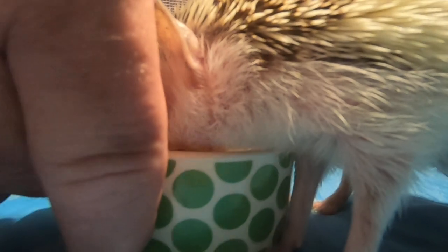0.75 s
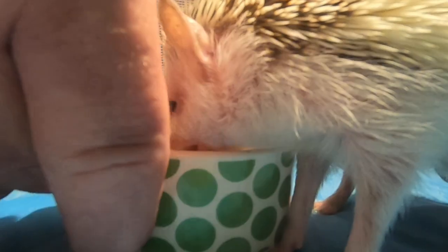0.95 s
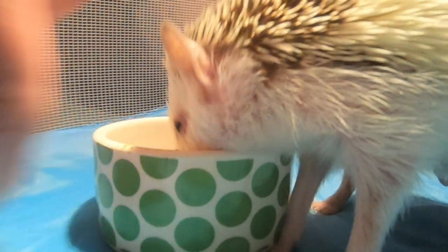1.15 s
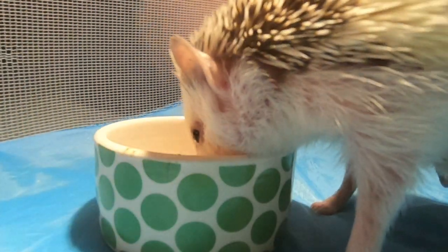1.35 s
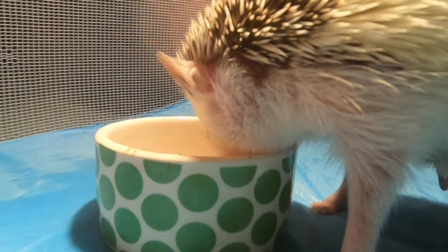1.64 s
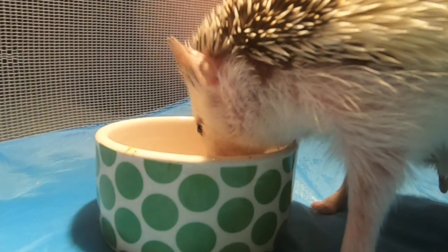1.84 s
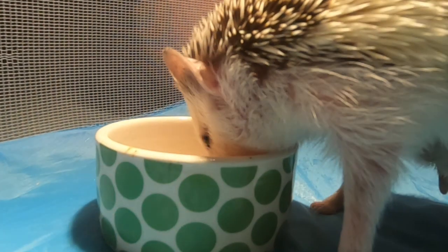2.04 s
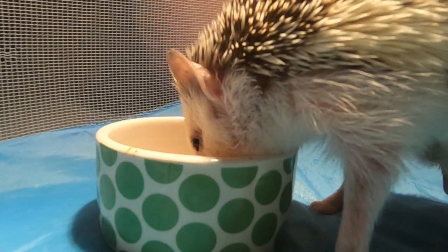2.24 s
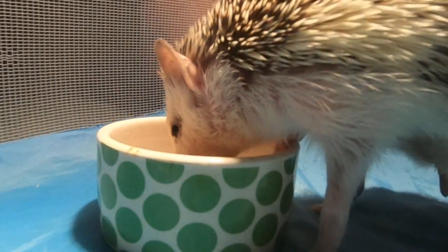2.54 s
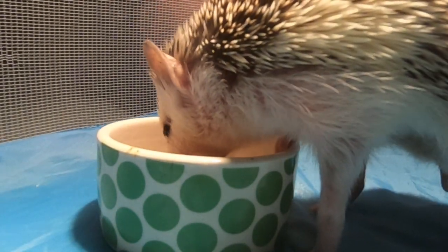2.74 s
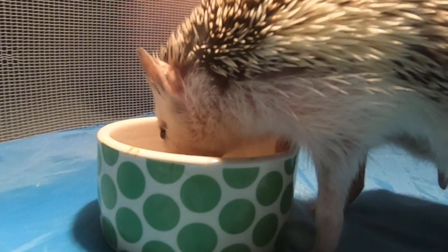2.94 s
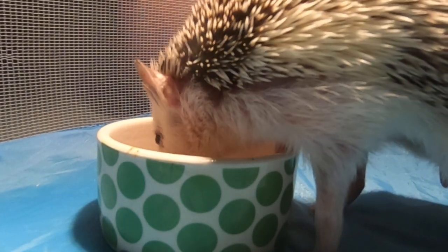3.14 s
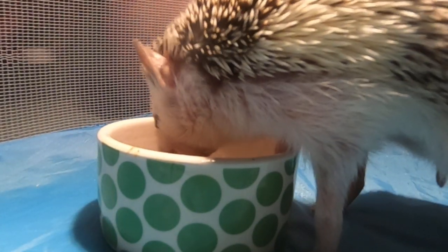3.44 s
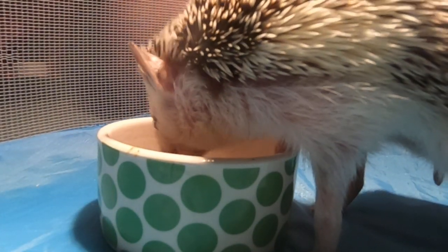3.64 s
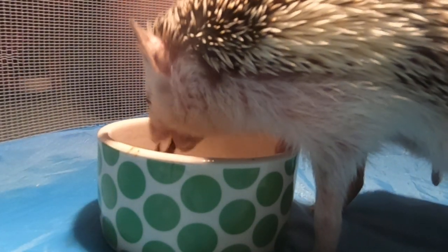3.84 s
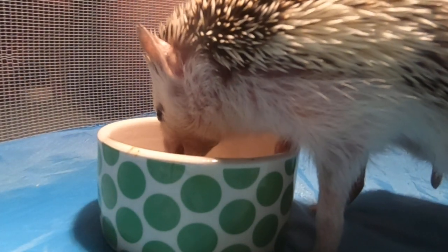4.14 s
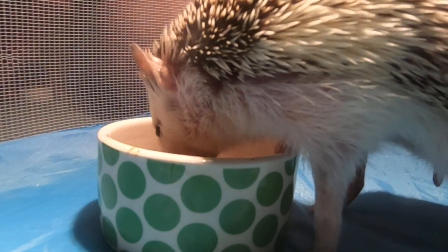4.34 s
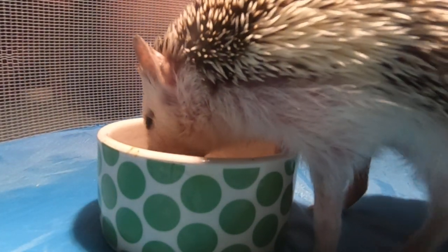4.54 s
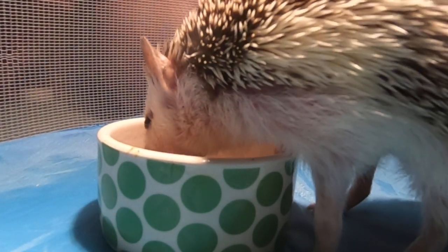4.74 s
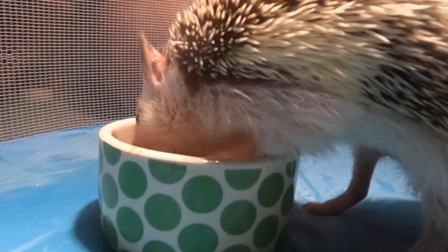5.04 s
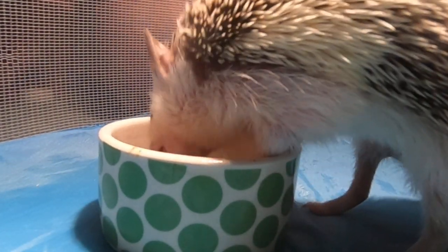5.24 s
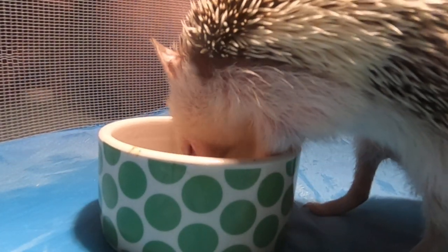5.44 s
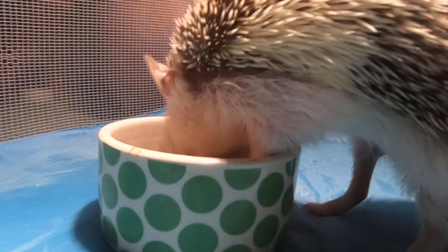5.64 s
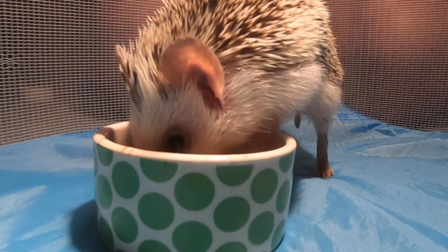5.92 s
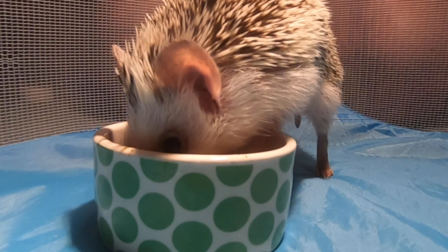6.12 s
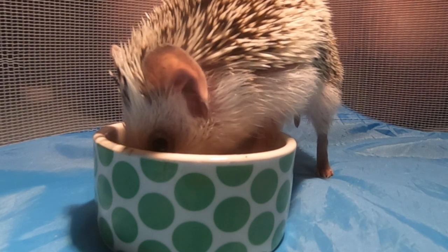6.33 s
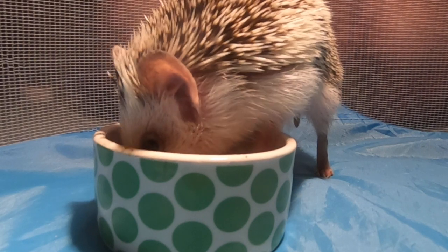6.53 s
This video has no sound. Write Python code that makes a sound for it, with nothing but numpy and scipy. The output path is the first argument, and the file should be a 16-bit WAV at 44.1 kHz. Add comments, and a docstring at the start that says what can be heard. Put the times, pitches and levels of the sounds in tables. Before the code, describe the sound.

Handling thumps and a short gritty bowl scrape, then close, rapid wet crunching and lapping with tiny ceramic ticks in a quiet, faintly humming room.

```python
"""Quiet room: a hedgehog laps and chews soft food in a small ceramic bowl close to a two-port microphone.
Strokes, about five a second once chewing runs, shape grain noise into wet fizz and crunch; sine bursts
make snaps and ticks. Early on a hand jolts the microphone (slow swings, rattle), slides on the rim and
scrapes the bowl. Underneath: a wavering sine hum, low rings and dull thuds, and room noise."""
import sys
import numpy as np
from scipy import signal
from scipy.fft import rfft, irfft, next_fast_len
from scipy.io import wavfile
from scipy.ndimage import uniform_filter1d, map_coordinates

SR = 44100
rng = np.random.default_rng(int(sys.argv[2]) if len(sys.argv) > 2 else 0)


def pcm_store(signal):
    """Save signal as 16-bit PCM."""
    levels = np.round(np.clip(np.atleast_2d(signal), -1, 1) * 32767)
    wavfile.write(sys.argv[1], SR, levels.astype(np.int16).T)


def decibels_to_gain(level_db):
    """Convert a level in decibels to a linear amplitude gain (20 dB per decade)."""
    exponent = np.asarray(level_db, float) / 20
    return 10 ** exponent


N = 294588

# Near-source levels, strokes to scrape, are before NEAR_GAIN_DB, port tilt and walls.
# strokes: first a crunchy contact and faint hissy touches, then firm bites and soft licks:
#   (time [s], stroke level [dB], bowl knock drive over stroke [dB], crunch over stroke [dB])
STROKES = [(0.022, -54.5, 9.5, 11), (0.115, -58, -4, -9), (0.166, -65, -3, -18), (0.532, -57, -12, -15),
           (0.891, -45.5, -29, -8), (1.215, -42.5, -23, -11), (1.314, -57.5, -8, 2),
           (1.473, -49.5, -11, -10), (1.561, -51, -9, -10), (1.678, -39.5, -16.5, -14),
           (1.774, -52.5, -9, -7), (1.889, -44.5, -14, -11.5), (1.969, -53, -16, -7),
           (2.088, -38.5, -21, -21), (2.172, -52.5, -17, -17), (2.279, -39, -18, -12),
           (2.364, -54.5, -11, -26), (2.483, -48, -13, -9), (2.567, -52.5, -13, -36),
           (2.676, -41, -15, -14), (2.762, -56, -10, -34), (2.873, -38.5, -20, -11), (2.959, -54, -16, -13),
           (3.072, -43.5, -16, -17), (3.155, -50, -13, -36), (3.267, -45.5, -15, -17),
           (3.352, -54.5, -25, -26), (3.466, -42, -20, -20), (3.555, -55.5, -13, -4),
           (3.663, -43, -13, -12.5), (3.754, -56.5, -17, -5), (3.871, -46, -16, -2),
           (3.963, -58.5, -11, -12), (4.075, -44, -14, -12.5), (4.166, -55.5, -11, -11),
           (4.281, -45, -12, -12.5), (4.381, -56, -9, -19), (4.494, -50.5, -20, -18),
           (4.578, -55.5, -1.5, -9), (4.691, -46.5, -16, -18), (4.79, -57.5, -11, -19),
           (4.899, -41, -15, -30), (4.992, -58.5, -20, 0), (5.109, -48.5, -28, -8),
           (5.337, -47, -13, -10.5), (5.583, -45, -30, -12), (5.868, -42, -12.5, -5.5),
           (6.149, -47, -10, -12), (6.4, -52.5, -5, -7), (6.63, -47, -6, -13)]
# mouth work between strokes: (time [s], crackle level [dB], fizz level [dB])
MOUTH_WORK = [(0.0, -65, -59), (0.13, -67, -62), (0.24, -59.5, -62.5), (0.28, -80, -80), (0.48, -73, -77),
              (0.56, -66.5, -67), (0.84, -70, -54.5), (0.89, -55.5, -65), (1.19, -60.5, -68),
              (1.9, -68.5, -64), (2.5, -60.5, -65), (3.0, -67, -66), (3.7, -63.5, -66), (3.92, -58, -65),
              (4.22, -68, -64.5), (4.52, -58.5, -64), (4.82, -63, -69.5), (5.15, -61, -65),
              (5.44, -63, -68), (5.53, -70.5, -69), (5.7, -58.5, -68), (5.98, -60, -67), (6.07, -66.5, -76),
              (6.22, -62, -64), (6.35, -66, -77), (6.45, -62.5, -71), (6.68, -67.5, -67.5)]
# wet snaps inside the bites: (time [s], amplitude [dB], pitch [Hz])
SNAPS = [(1.2157, -27, 9460), (1.474, -41, 9500), (1.4787, -39, 9500), (1.6571, -40, 9600),
         (1.6723, -39, 9350), (1.68, -41, 9200), (1.6833, -33, 10300), (1.887, -42, 9410),
         (2.084, -39, 9040), (2.089, -43, 9190), (2.0912, -36, 9400), (2.279, -45, 9700),
         (2.2817, -40, 9080), (2.4786, -40, 8400), (2.481, -38, 9700), (2.487, -34, 8800),
         (2.6761, -42, 9600), (2.679, -43, 9600), (2.877, -36, 9200), (3.05, -41, 8960),
         (3.0703, -43, 9300), (3.075, -32, 8460), (3.1533, -37, 9300), (3.265, -36, 9460),
         (3.2682, -33.5, 9200), (3.465, -32, 10100), (3.4684, -34, 9100), (3.6591, -35, 10300),
         (3.6637, -36, 9900), (3.8704, -36, 9500), (3.8743, -44, 9280), (4.0715, -32.5, 10100),
         (4.0757, -40, 9150), (4.28, -39, 9120), (4.2827, -39, 9000), (4.285, -35, 9470),
         (4.4936, -34.5, 9400), (4.6874, -42, 9740), (4.6928, -35, 10000), (4.8987, -41, 8900),
         (5.1094, -41, 8590), (5.3372, -38, 10270), (5.5801, -35, 9140), (5.5843, -29.5, 9200),
         (5.8674, -43, 9200), (5.87, -34, 9300), (6.403, -37, 8650), (6.6294, -37, 10300)]
# teeth and food on the bowl: (time [s], amplitude [dB], pitch [Hz])
KNOCKS = [(1.2141, -47, 780), (1.458, -54.5, 770), (1.6768, -56, 720), (1.8876, -48, 760),
          (2.0849, -49.5, 765), (2.2127, -52.5, 805), (2.5773, -48, 696), (2.6525, -54, 750),
          (2.6732, -55, 785), (2.8494, -46, 700), (2.8722, -57, 820), (3.0673, -48.5, 770),
          (3.2652, -55, 780), (3.6586, -55, 840), (3.8673, -52, 770), (4.0701, -43.5, 880),
          (4.2817, -50.5, 750), (4.387, -56, 730), (4.4883, -48, 730), (4.5131, -44.5, 634),
          (4.5835, -62, 775), (4.6717, -46, 740), (4.6869, -55, 810), (5.1034, -53, 760),
          (5.3358, -48, 850), (5.5825, -47, 685), (5.8674, -43.5, 730), (6.1456, -46.5, 796),
          (6.6197, -48, 780)]
# rise times handed out to the knocks in turn, for variety: (rise [ms] of each)
KNOCK_RISES_MS = (.9, 1.9, 1.3)
# ticks of handling, bowl scrape, tongue and food: (time [s], blow [dB], pitch [Hz])
TICKS = [(0.025, -20, 2180), (0.071, -30, 1010), (0.169, -24, 7350), (0.233, -33, 3280), (0.371, -46, 2950),
         (0.391, -45.5, 6000), (0.5048, -34, 9300), (0.518, -39, 6060), (0.5877, -27, 8700),
         (0.6322, -39, 6500), (0.6659, -36, 6100), (0.7257, -15, 2680), (0.7066, -14, 2284),
         (0.7605, -18, 2740), (0.902, -24, 3280), (0.989, -28.5, 2600), (1.01, -36, 2500),
         (1.045, -33.5, 3400), (1.0729, -35, 2440), (1.2049, -32.5, 3470), (1.242, -30, 8600),
         (1.2595, -29, 4700), (1.312, -29, 5830), (1.4583, -31, 3200), (1.5607, -30, 3700),
         (1.578, -48, 3520), (1.5838, -36, 2800), (1.6117, -33, 2250), (1.723, -33.5, 8690),
         (1.787, -33, 8500), (1.8021, -35, 4200), (1.826, -37, 6000), (1.8875, -34, 6790),
         (1.9153, -32.5, 5060), (1.94, -36, 3520), (1.9737, -30, 4700), (2.0505, -35, 6700),
         (2.2136, -37, 2370), (2.279, -36, 5070), (2.315, -38, 4500), (2.3638, -32, 3620),
         (2.389, -40, 8000), (2.4215, -38.5, 2740), (2.452, -31.5, 5000), (2.513, -36, 4000),
         (2.536, -47, 5030), (2.796, -37, 2100), (2.825, -32.5, 9000), (3.047, -30, 7860),
         (3.1782, -41, 4000), (3.5148, -33, 6610), (3.5316, -29.5, 3430), (3.7397, -38, 6100),
         (4.1671, -30.5, 9600), (4.185, -32, 6400), (4.3205, -27.5, 5800), (4.5127, -22.5, 3620),
         (4.533, -32, 1360), (5.149, -27, 2560), (5.243, -37, 5200), (5.256, -33.5, 5830),
         (5.4278, -36, 5600), (5.447, -38, 5540), (5.6564, -31, 4850), (5.842, -35, 4440),
         (5.8675, -30.5, 4500), (5.935, -37, 6000), (5.9567, -31.5, 6950), (5.966, -35, 5330),
         (5.989, -36, 5540), (6.202, -37.5, 2820), (6.223, -36, 4840), (6.438, -38, 4800),
         (6.5103, -33, 6100)]
# soft rustle in the hollow of the bowl: (time [s], level [dB])
RUSTLE = [(0.0, -53.5), (.05, -56.5), (0.13, -57), (0.29, -58.5), (0.34, -68), (0.43, -69.5), (.47, -65.5),
          (0.56, -62.5), (0.65, -63), (0.82, -61), (0.89, -66), (1.2, -70.5), (4.8, -76), (5.22, -71),
          (5.41, -83), (5.62, -73), (5.85, -73), (6.25, -77), (6.68, -80)]
# thin nose whistles: (start [s], end [s], start pitch [Hz], end pitch [Hz], level [dB], waver [Hz])
WHISTLES = [(.262, .316, 14400, 8500, -70, 50), (.238, .29, 10900, 8500, -73, 50),
            (.287, .303, 11800, 13900, -78, 50), (.172, .2, 9500, 10300, -72, 90),
            (5.145, 5.24, 10750, 11900, -68, 40), (5.225, 5.29, 11800, 12200, -69, 40),
            (5.58, 5.98, 2290, 2190, -69, 65)]
# fingers slide on the rim: (time [s], level [dB], power share of the high band [0-1])
SLIDE = [(.44, -81, 0.1), (.48, -70, .15), (.52, -64, 0.2), (.58, -64, 0.4), (.63, -61, 0.5),
         (.67, -67, 0.7), (.7, -85, .8)]
# bowl dragged over the mat: (time [s], level [dB])
SCRAPE = [(0.66, -63), (0.683, -61), (0.688, -43.5), (0.702, -32.5), (0.728, -33), (0.744, -43),
          (0.765, -41), (0.782, -33), (0.803, -30), (0.826, -37.5), (0.85, -50.5), (0.9, -56), (0.93, -46),
          (0.95, -61), (1.1, -65)]
# microphone swings: (time [s], swing rate [Hz], Gaussian sigma [ms], amplitude before envelope [dB])
JOLTS = [(0.192, 16.7, 25.5, -26.5), (0.269, 20, 32, -37), (.418, 15, 45, -43.5), (.6, 17, 33, -51)]
# handling rattle: (time [s], level [dB])
RATTLE = [(0.1, -65), (0.16, -64), (0.2, -54), (0.25, -51), (0.264, -41.5), (0.29, -42.5), (0.318, -50.5),
          (0.372, -47), (0.42, -53), (0.462, -63), (0.61, -59), (0.65, -70)]
# hum strength: (time [s], amplitude [dB])
HUM_LEVEL = [(0.0, -65), (0.33, -53.5), (1.05, -66.5), (2.0, -62.5), (2.85, -61.5), (3.12, -55.5),
             (3.37, -61), (3.7, -58.5), (3.91, -54.5), (4.13, -68), (4.25, -59), (4.6, -51), (4.74, -64.5),
             (4.84, -53.5), (5.12, -60.5), (5.25, -74), (5.75, -71), (5.9, -91), (6.2, -65), (6.68, -85)]
# pitch of the hum, with a second, higher tone taking its place at 3.1-3.27 s: (time [s], pitch [Hz])
HUM_PITCH = [(0, 159.7), (.6, 163), (2.3, 152.8), (3.0, 158), (3.1, 171.5), (3.27, 170.4), (3.37, 157.5),
             (4.2, 157.4), (4.6, 160.7), (5.1, 163), (6.68, 164.9)]
# low rings: handling knocks near 115 and 200 Hz first, otherwise dull thuds near 60 Hz:
#   (time of peak [s], amplitude [dB], pitch [Hz])
LOW_RINGS = [(.178, -48, 200), (.277, -40, 116), (0.363, -40, 114), (.32, -48, 62), (0.387, -49, 62),
             (.56, -54.5, 62), (0.711, -53.5, 62.5), (1.531, -55, 70.6), (1.691, -53.5, 57.6),
             (1.901, -55, 63), (2.059, -56, 59.7), (2.181, -59, 57), (2.421, -58, 63), (2.511, -55, 57.6),
             (2.61, -55, 58), (2.981, -52, 63), (3.1, -54, 62.5), (3.601, -52, 60), (3.79, -55, 60.4),
             (3.88, -57, 65), (4.07, -54, 58), (4.24, -54, 65.6), (4.31, -53, 61.5), (4.62, -56, 63),
             (4.99, -54, 67.4), (5.469, -60, 66.4), (6.221, -63.5, 58.6), (6.599, -60, 60.3)]
# table tremor, fading out near 5.3 s and returning: (time [s], level [dB])
TREMOR_LEVEL = [(0, -70), (1.3, -72), (2, -67), (5, -70.5), (5.3, -94), (6.68, -69)]
# room noise: (time [s], level [dB])
ROOM_LEVEL = [(0, -53), (1.2, -60), (2.4, -57.5), (3.3, -57), (4.4, -59.5), (5.3, -58), (6, -58.5),
              (6.68, -58.5)]

# noise spectrum of the fizz: (frequency [Hz], relative density [dB per Hz])
FIZZ_SPECTRUM = [(2500, -120), (5000, -12), (6500, -8.5), (8400, -2), (9400, -0.5), (11500, -4.5),
                 (14000, -15), (16000, -22)]
# of the crunch: (frequency [Hz], relative density [dB per Hz])
CRUNCH_SPECTRUM = [(700, -120), (1200, 0), (2300, 0.5), (3400, 1.5), (4500, 2.5), (6200, 3.5), (7500, -3),
                   (11000, -37), (15000, -90)]
# of the scrape: (frequency [Hz], relative density [dB per Hz])
SCRAPE_SPECTRUM = [(240, -17.5), (400, -12.5), (460, -14), (687, -13), (742, -18.5), (2220, -3.5),
                   (2880, -5.5), (3120, -2.5), (6240, -8), (10100, -15), (13500, -27), (16000, -47)]
# of the rattle: (frequency [Hz], relative density [dB per Hz])
RATTLE_SPECTRUM = [(40, -31), (70, -7.5), (115, -4.5), (220, -7.5), (400, -18), (800, -35), (1500, -120)]
# of the table tremor: (frequency [Hz], relative density [dB per Hz])
TREMOR_SPECTRUM = [(30, -9), (50, -9), (60, 10.5), (72, -7), (115, -0.5), (200, -81), (400, -120)]
# of the room: (frequency [Hz], relative density [dB per Hz])
ROOM_SPECTRUM = [(15, -50), (25, -21), (59, -9.5), (99, -18.5), (128, -7), (152, 0.5), (190, 1.5),
                 (582, -14), (670, -13.5), (762, -7.5), (870, -12), (997, -15), (3340, -33), (5730, -34),
                 (7910, -42), (9810, -33.5), (13500, -63), (15500, -33)]

# bowl resonances, applied twice: (centre [Hz], width [Hz], gain per pass [dB])
BOWL_MODES = [(500, 320, -1), (790, 380, 2), (1200, 450, -3)]
# hollow resonances, applied twice: (centre before drift [Hz], width [Hz], gain per pass [dB])
HOLLOW_MODES = [(1300, 570, -1), (2370, 355, 2.5), (3150, 600, -1), (4700, 890, -4)]
# rim resonance at the start of the slide, applied twice: (centre [Hz], width [Hz], gain per pass [dB])
RIM_LOW_MODES = [(2600, 500, 0)]
# rim resonance at its end, applied twice: (centre [Hz], width [Hz], gain per pass [dB])
RIM_HIGH_MODES = [(3100, 500, 0)]

# port phase for a near source: (frequency [Hz], left lead [rad])
PORT_LEAD = [(100, 14.5), (800, -0.5), (2200, 0.48), (3500, 1), (5300, -1), (9300, -1.5), (13000, -1.5),
             (16000, -2.5)]
# port balance for a near source: (frequency [Hz], left over right [dB])
PORT_TILT = [(200, 9), (700, -6), (1400, -6.5), (2400, -4), (4400, -2.5), (8000, -1), (15000, -3.5)]
# likeness of the room noise at the ports: (frequency [Hz], correlation, clipped to -1..1)
ROOM_LIKENESS = [(60, 0.63), (130, 0.57), (290, 0.46), (640, -0.56), (1400, -0.76), (3100, -1.2),
                 (6800, -0.23), (15000, -0.041)]
# decay of the walls' answer: (frequency [Hz], T60 [s])
WALL_DECAY = [(300, 0.35), (3000, 0.09), (12000, 0.024)]

FIRM_DB = -52.5  # a stroke above this is a firm bite, any other is soft
BITE_RISE_MS, BITE_FALL_MS, BITE_STEEPNESS = 9.3, 5.7, 3  # times at SHARP_DB; steepness of the fall
SOFT_RISE_MS, SOFT_FALL_MS, SOFT_STEEPNESS = 6.5, 19, 1.5
SHARP_DB, STRETCH_PER_DB = -46, 0.12  # weaker bites last longer, stronger ones are shorter
BITE_FIZZ_DB = -1.5  # fizz over stroke level
TRAIL_DB, TRAIL_T60_MS = -13, 140  # fizz left behind by a stroke
SMACK_MS, SMACK_WIDTH_MS, SMACK_DB, SMACK_SCATTER_DB = 32.3, 12, -63, 1.5  # jaw reopens after a firm bite
PAUSE_MS, PAUSE_WIDTH_MS, PAUSE_DB = 25, 12, 7  # mouth falls quiet just before a soft stroke
CRACKLE_PAUSE_SHARE, FIZZ_WORK_SHARE = 0.45, 0.12
WORK_PEAK_MS, WORK_RISE_DB, WORK_FADE_DB_PER_S = 90, 4.5, 45  # after a firm bite
FIZZ_FLICKER_DB = 3.2
BOWL_KNOCK_GAIN_DB = 18
SNAP_RISE_MS, SNAP_BODY_DB, SNAP_BODY_PITCH_RATIO = 0.4, -9, 0.5
TICK_RISE_MS, TICK_FALL_MS = 0.27, 0.18
TICK_RING_DB, TICK_KNOCK_DB = -5, -1  # ring and bowl drive over the blow
HOLLOW_DRIFT = 0.03  # share by which the resonances slide as the snout moves
WHISTLE_FLICKER_DB = 2
JOLT_RIGHT_DB = 2  # right port over left
LOW_RING_RISE_S, LOW_RING_T60_S = 0.0301, 0.12
NEAR_GAIN_DB, WALLS_GAIN_DB = -2.5, -16.5
MIC_TOP_HZ = 15800


def unit(x):
    """Scales to rms 1."""
    return x / np.sqrt(np.mean(x ** 2) + 1e-20)


def along(points, hz):
    """Interpolates (frequency [Hz], value) on a log axis."""
    f, v = np.transpose(points)
    return np.interp(np.log(hz + 1), np.log(f + 1), v)


def curves(rows, outside=None):
    """One value per sample for each column after the time."""
    s, *cols = np.transpose(rows)
    return [np.interp(np.arange(N) / SR, s, c, outside, outside) for c in cols]


def wobble(rate_hz):
    """Smooth random curve, rate_hz knots a second."""
    knots = rng.standard_normal(int(N * rate_hz / SR) + 4)
    return map_coordinates(knots, [np.arange(N) * rate_hz / SR])


def filtered(x, response):
    """Multiplies the spectrum by a complex response of frequency."""
    m = next_fast_len(N + SR // 2)
    return irfft(rfft(x, m) * response(np.fft.rfftfreq(m, 1 / SR)), m)[..., :N]


def resonant(x, modes):
    """Causal second-order resonances in parallel, signs alternating."""
    def response(f):
        return sum((-1) ** k * decibels_to_gain(db) * 1j * f * w / (c * c - f * f + 1j * f * w)
                   for k, (c, w, db) in enumerate(modes))
    return filtered(x, response)


def twice_resonant(x, modes):
    """Two passes through the same resonances."""
    return resonant(resonant(x, modes), modes)


def grains(spectrum, rate_hz, spread_db, smooth, apart):
    """Coloured random clicks of uneven size over a share of smooth noise, rms 1; apart differs by port."""
    hit, size = rng.random(N), rng.exponential(size=N)
    hiss, other = rng.standard_normal((2, N))
    clicks = unit((hit < rate_hz / SR) * np.sign(hiss) * decibels_to_gain(np.minimum(spread_db * size, 16)))
    share = np.clip(smooth, 0, 1)
    common = np.sqrt(1 - share) * clicks + np.sqrt(share) * hiss
    ports = common + apart * other * [[1], [-1]]
    return unit(filtered(ports, lambda hz: decibels_to_gain(along(spectrum, hz))))


def pair(spectrum, likeness):
    """Two-port noise, rms 1; the mid/side split by frequency sets the port correlation."""
    def response(hz):
        turn = np.arccos(np.clip(along(likeness, hz), -1, 1)) / 2
        return decibels_to_gain(along(spectrum, hz)) * [np.cos(turn), np.sin(turn)]
    mid, side = filtered(rng.standard_normal((2, N)), response)
    return unit(np.array([mid + side, mid - side]))


def chewing():
    """Strokes squeeze softly and peak as wet fizz, crunch and bowl knock.

    Bites end quickly; licks start quickly and linger.
    """
    fizz, crunch, knock, pause_db = np.zeros((4, N + SR))
    lead = SR // 8
    ms = np.arange(-lead, lead) * 1000 / SR
    for s, db, knock_db, crunch_db in STROKES:
        firm = db > FIRM_DB
        if firm:
            stretch = np.exp(STRETCH_PER_DB * (SHARP_DB - db))
            rise_ms, fall_ms, steepness = BITE_RISE_MS * stretch, BITE_FALL_MS * stretch, BITE_STEEPNESS
        else:
            rise_ms, fall_ms, steepness = SOFT_RISE_MS, SOFT_FALL_MS, SOFT_STEEPNESS
        rise_loss_db = 11 * (abs(ms) / rise_ms) ** 2.4
        fall_loss_db = 11 * (abs(ms) / fall_ms) ** steepness
        shape = decibels_to_gain(db - np.where(ms < 0, rise_loss_db, fall_loss_db))
        # firm bites squeeze most
        squeeze = decibels_to_gain(db - 21.5 + 0.5 * (db + 47.5) - 65 * ((ms + 19) / 16) ** 4)
        trail = (ms > 0) * decibels_to_gain(db + TRAIL_DB - 60 * ms / TRAIL_T60_MS)
        smack_db = SMACK_DB + SMACK_SCATTER_DB * rng.normal()
        smack = firm * decibels_to_gain(smack_db - 4.3 * ((ms - SMACK_MS) / SMACK_WIDTH_MS) ** 2)
        at = slice(round(s * SR), round(s * SR) + len(ms))
        fizz[at] += shape * decibels_to_gain(BITE_FIZZ_DB) + squeeze + trail
        crunch[at] += shape * decibels_to_gain(crunch_db) + smack
        pause_db[at] -= (not firm) * PAUSE_DB * np.exp(-((ms + PAUSE_MS) / PAUSE_WIDTH_MS) ** 2)
        knock[at] += decibels_to_gain(db + knock_db - 3.5 * (ms / 3) ** 2)
    fizz, crunch, knock, pause_db = (e[lead:][:N] for e in (fizz, crunch, knock, pause_db))

    crackle_db, bed_db = curves(MOUTH_WORK)
    work_db = mouth_work()
    strokes = fizz * decibels_to_gain(pause_db) * grains(FIZZ_SPECTRUM, 3500, spread_db=3, smooth=0.45, apart=0.7)
    bed_db = bed_db + pause_db + FIZZ_WORK_SHARE * work_db + FIZZ_FLICKER_DB * wobble(30)
    bed = decibels_to_gain(bed_db) * grains(FIZZ_SPECTRUM, 1200, spread_db=5.5, smooth=0.18, apart=0.51)

    # bubbles come in clusters
    bubbles = unit(decibels_to_gain(3 * wobble(45)) * pings(450, 1700, 7500, cycles=0.6, spread_db=5))
    crackle = grains(CRUNCH_SPECTRUM, 640, spread_db=5.5, smooth=0.41, apart=0.31)
    wet = unit(decibels_to_gain(3.5) * crackle + bubbles)
    crackle_db = crackle_db + work_db + CRACKLE_PAUSE_SHARE * pause_db + 3.1 * wobble(30)
    middle = (crunch + decibels_to_gain(crackle_db)) * wet

    bowl = decibels_to_gain(BOWL_KNOCK_GAIN_DB) * twice_resonant(knock * rng.standard_normal(N), BOWL_MODES)
    return strokes + bed + middle + bowl


def mouth_work():
    """Mouth work [dB] swells after a firm bite, then fades; 0 before the second firm bite."""
    t = np.arange(N) / SR
    bites = np.array([s for s, db, *_ in STROKES if db > FIRM_DB])
    last = np.searchsorted(bites, t) - 1
    peak_s = WORK_PEAK_MS / 1000
    late_s = t - bites[last] - peak_s
    work_db = np.where(late_s < 0, WORK_RISE_DB * late_s / peak_s, -WORK_FADE_DB_PER_S * late_s)
    return uniform_filter1d(work_db * (last > 0), size=SR // 50)


def pings(rate_hz, low_hz, high_hz, cycles, spread_db):
    """Random tiny bubbles, each a short sine burst of its own pitch, rms 1."""
    when, pitch, size = rng.random((int(rate_hz * N / SR), 3)).T
    hz = (low_hz * (high_hz / low_hz) ** pitch)[:, None]
    k = np.arange(SR // 200)
    envelope = np.exp(-(k / SR * hz / cycles - 2) ** 2)
    ring = np.sin(2 * np.pi * hz * k / SR) * envelope * np.sqrt(hz)
    ring *= decibels_to_gain(np.minimum(-spread_db * np.log(size + 1e-9), 18))[:, None]
    at = (when * N).astype(int)[:, None] + k
    return unit(np.bincount(at.ravel(), ring.ravel(), N + SR)[:N])


def rings(rows, rise_ms):
    """Sine bursts whose envelopes peak at the given times and die a few rise times later."""
    out = np.zeros(N + SR)
    u = np.arange(SR // 50) * 1000 / SR / rise_ms
    envelope = (u * np.exp(1 - u)) ** 2
    for s, db, hz in rows:
        tone = np.sin(2 * np.pi * (hz * u * rise_ms / 1000 + rng.random()))
        out[round((s - rise_ms / 1000) * SR):][:len(u)] += decibels_to_gain(db) * envelope * tone
    return out[:N]


def snaps():
    """Bright snap bursts, each with a duller body under it, and the bowl's knocks."""
    body = [(s, db + SNAP_BODY_DB, hz * SNAP_BODY_PITCH_RATIO) for s, db, hz in SNAPS]
    turns = len(KNOCK_RISES_MS)
    knocks = sum(rings(KNOCKS[k::turns], ms) for k, ms in enumerate(KNOCK_RISES_MS))
    return rings(SNAPS, SNAP_RISE_MS) + rings(body, SNAP_RISE_MS / 2) + knocks


def ticks():
    """Each tick is a very brief, nearly symmetric burst at its pitch that also knocks the bowl."""
    out, blows = np.zeros(N + SR), np.zeros(N)
    t = np.arange(SR // 200) / SR
    lead = SR // 500
    late_ms = (t - lead / SR) * 1000
    envelope = np.exp(-(late_ms / np.where(late_ms < 0, TICK_RISE_MS, TICK_FALL_MS)) ** 2)
    for s, db, hz in TICKS:
        at = round(s * SR)
        out[at - lead:][:len(t)] += decibels_to_gain(db + TICK_RING_DB) * np.cos(2 * np.pi * hz * t) * envelope
        blows[at] = decibels_to_gain(db + TICK_KNOCK_DB)
    return out[:N] + twice_resonant(blows, BOWL_MODES)


def rustle():
    """Soft noise drifting between two tunings of the hollow, and a few gliding whistles."""
    level_db, = curves(RUSTLE)
    flutter_db = 2.5 * wobble(25)
    turn = np.pi / 4 * (1 + np.tanh(wobble(14)))
    tunings = []
    for way in (-1, 1):
        modes = [(hz * (1 + way * HOLLOW_DRIFT), width, db) for hz, width, db in HOLLOW_MODES]
        noise = rng.standard_normal(N) * decibels_to_gain(3 * wobble(150))
        tunings.append(unit(twice_resonant(noise, modes)))
    low, high = tunings
    out = decibels_to_gain(level_db + flutter_db) * (np.cos(turn) * low + np.sin(turn) * high)
    for start, end, start_hz, end_hz, db, waver_hz in WHISTLES:
        n = round((end - start) * SR)
        glide_hz = np.linspace(start_hz, end_hz, n) + waver_hz * wobble(59.6)[:n]
        level = decibels_to_gain(db + WHISTLE_FLICKER_DB * wobble(40)[:n]) * np.hanning(n) ** 0.5
        out[round(start * SR):][:n] += level * np.sin(2 * np.pi * np.cumsum(glide_hz) / SR)
    return out


def slide():
    """Grainy hiss ringing in the rim, crossfading from a low to a high band."""
    level_db, high = curves(SLIDE)
    high = np.clip(high, 0, 1)
    low_band, high_band = (unit(twice_resonant(rng.standard_normal(N) * decibels_to_gain(2.4 * wobble(120.7)), modes))
                           for modes in (RIM_LOW_MODES, RIM_HIGH_MODES))
    return decibels_to_gain(level_db) * (np.sqrt(1 - high) * low_band + np.sqrt(high) * high_band)


def scrape():
    """The bowl's foot stutters over the mat as dense grains."""
    level_db, = curves(SCRAPE, -120)
    drag = grains(SCRAPE_SPECTRUM, 4000, spread_db=1.5, smooth=0.4, apart=0.43)
    return decibels_to_gain(level_db + 1.5 * wobble(170)) * drag


def handling():
    """Jolts swing the pressure slowly on both ports; the case rattles loosely."""
    t = np.arange(N) / SR
    swing = np.zeros(N)
    for s, hz, ms, db in JOLTS:
        envelope = np.exp(-((t - s) * 1000 / ms) ** 2 / 2)
        swing += decibels_to_gain(db) * np.sin(2 * np.pi * hz * (t - s)) * envelope
    rattle_db, = curves(RATTLE, -120)
    rattle = decibels_to_gain(rattle_db + 1.7 * wobble(28.9)) * pair(RATTLE_SPECTRUM, [(100, 0.98)])
    return swing * decibels_to_gain([[-JOLT_RIGHT_DB / 2], [JOLT_RIGHT_DB / 2]]) + rattle


def walls(x):
    """Short answer of the pen's walls: decaying noise, different at each port."""
    hz, t, z = signal.stft(rng.standard_normal((2, SR // 4)), SR, nperseg=256)
    decay = decibels_to_gain(-60 * t / along(WALL_DECAY, hz)[:, None])
    tail = signal.istft(z * decay, SR, nperseg=256)[1]
    return signal.fftconvolve(x[None], tail / np.linalg.norm(tail[0]), axes=1)[:, :N]


def hum():
    """One sine follows the hum, then a higher tone in its place, and back; ports differ in phase and level."""
    (hum_db,), (hz,) = curves(HUM_LEVEL), curves(HUM_PITCH)
    phase = 2 * np.pi * np.cumsum(hz + 0.8 * wobble(8)) / SR
    tone = np.sin(phase + [[0.25], [-0.25]])
    return decibels_to_gain(hum_db + 1.3 * wobble(6.21)) * tone * decibels_to_gain([[1.2], [-1.2]])


def low_rings():
    """Handling knocks and dull thuds as low sines that swell briefly and decay, over the table tremor."""
    out, t = np.zeros(N + SR), np.arange(SR // 2) / SR
    rise = np.sin(np.pi / 2 * np.minimum(t / LOW_RING_RISE_S, 1)) ** 2
    envelope = rise * decibels_to_gain(-60 * np.maximum(t - LOW_RING_RISE_S, 0) / LOW_RING_T60_S)
    for s, db, hz in LOW_RINGS:
        tone = np.sin(2 * np.pi * (hz * t + rng.random()))
        out[round((s - LOW_RING_RISE_S) * SR):][:len(t)] += decibels_to_gain(db) * envelope * tone
    tremor_db = curves(TREMOR_LEVEL)[0] + 1.8 * wobble(11)
    return out[:N] + decibels_to_gain(tremor_db) * pair(TREMOR_SPECTRUM, [(60, 0.49)])


def room():
    """Rumble and hiss as two-port noise, swelling slightly."""
    level_db = curves(ROOM_LEVEL)[0] + 1.3 * wobble(6)
    return decibels_to_gain(level_db + np.array([[1.2], [-1.2]])) * pair(ROOM_SPECTRUM, ROOM_LIKENESS)


def scene():
    """Near sources reach the ports with frequency-dependent phase and balance; the rest adds directly."""
    side = np.array([[0.5], [-0.5]])
    near = chewing() + snaps() + ticks() + rustle() + slide()
    near = near + scrape() * decibels_to_gain(side * -4)  # scrape 4 dB stronger at right

    def port_response(hz):
        return decibels_to_gain(side * along(PORT_TILT, hz)) * np.exp(1j * side * along(PORT_LEAD, hz))
    direct = decibels_to_gain(NEAR_GAIN_DB) * filtered(near, port_response)
    reflected = decibels_to_gain(WALLS_GAIN_DB) * walls(near.mean(0))
    return direct + reflected + handling() + hum() + low_rings() + room()


def top_cut(x):
    """Nothing passes above the cut-off."""
    return signal.sosfilt(signal.butter(12, 16220, fs=SR, output="sos"), x)


def record(dry):
    """The microphone keeps nothing above its band limit."""
    mix = filtered(dry, lambda hz: hz < MIC_TOP_HZ)
    return top_cut(mix)


dry = scene()
out = record(dry)
pcm_store(out)
```